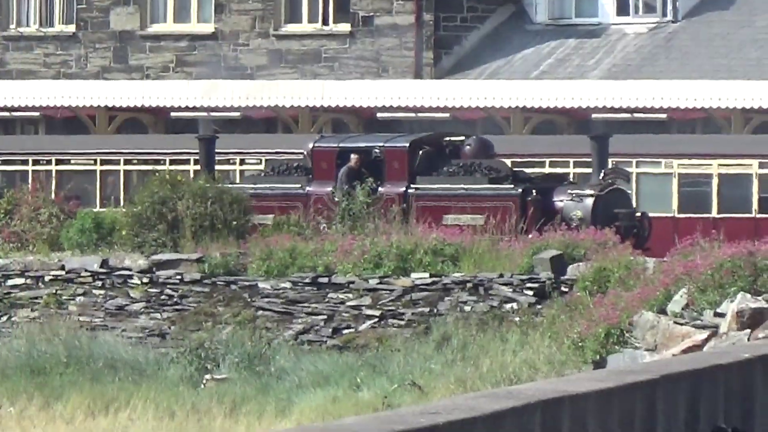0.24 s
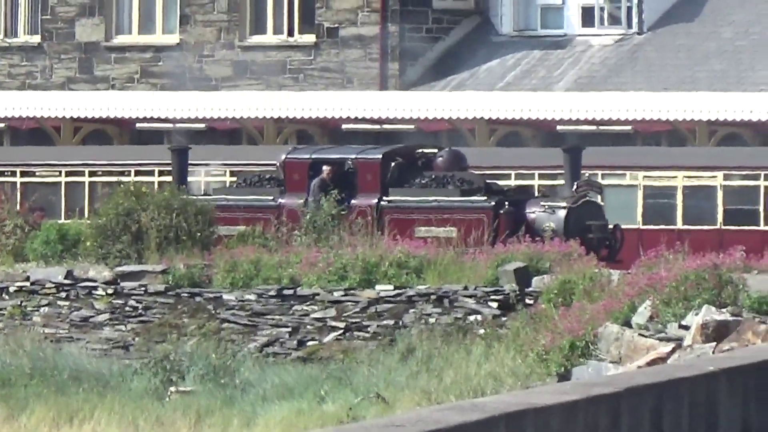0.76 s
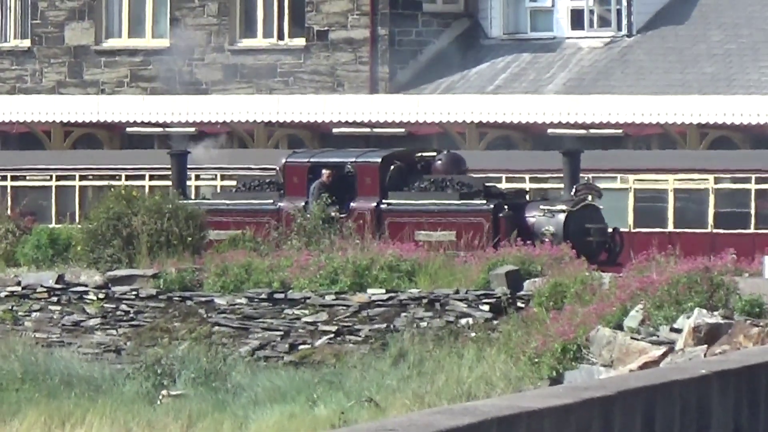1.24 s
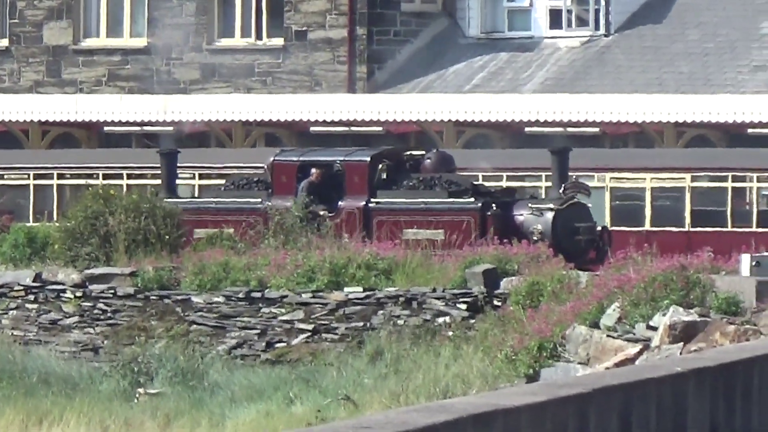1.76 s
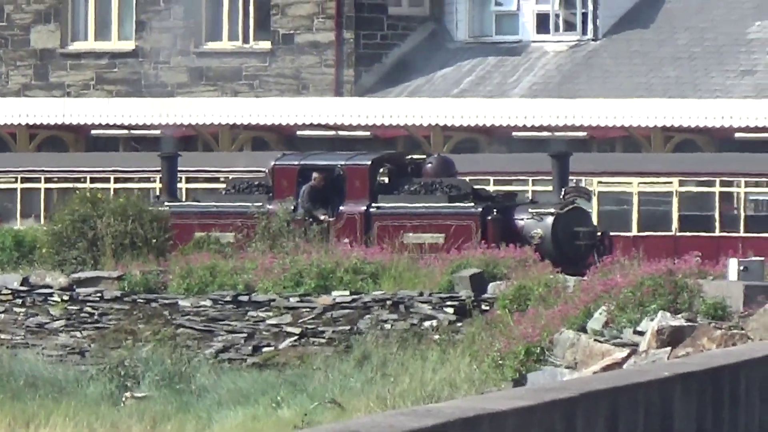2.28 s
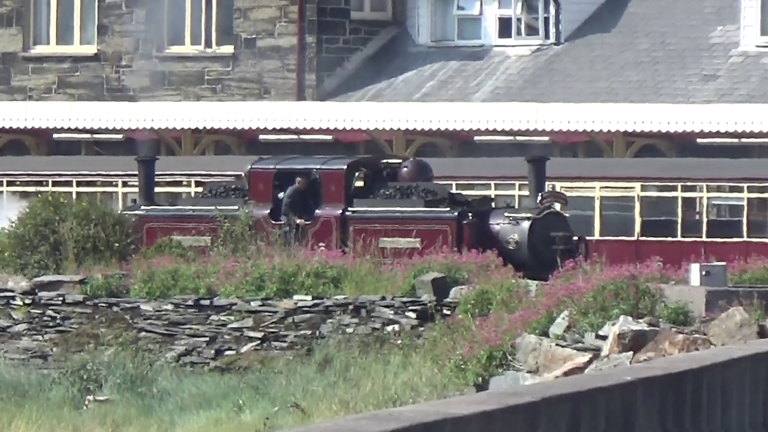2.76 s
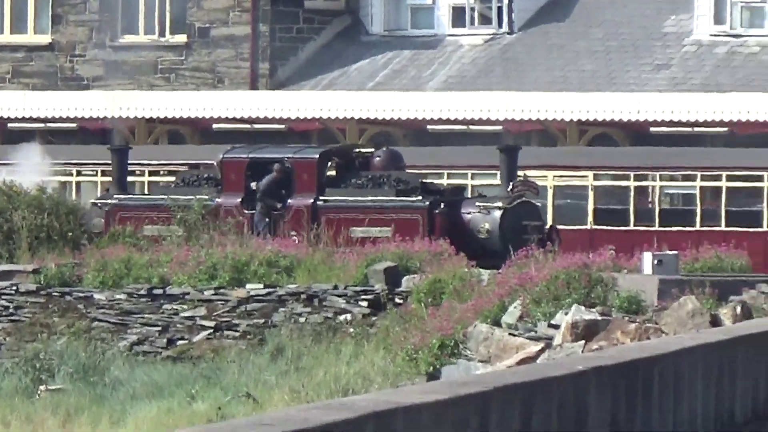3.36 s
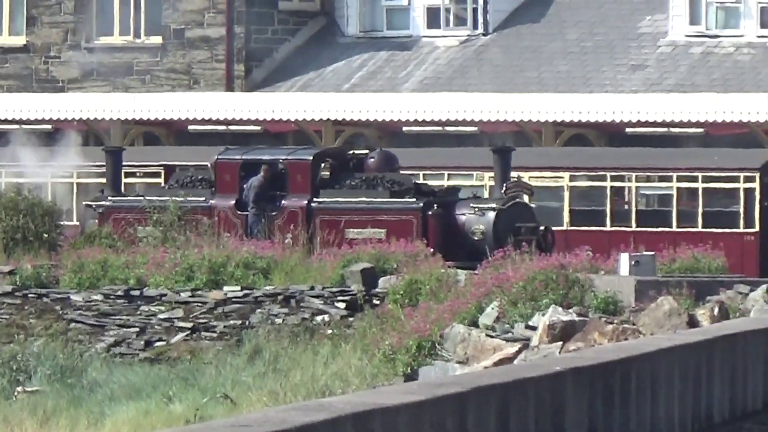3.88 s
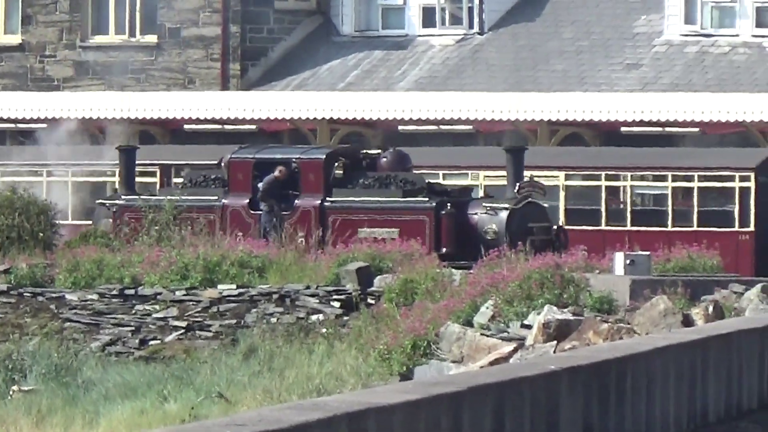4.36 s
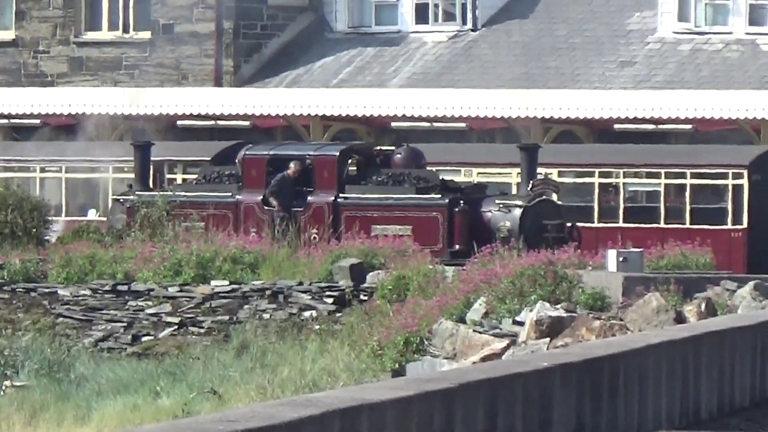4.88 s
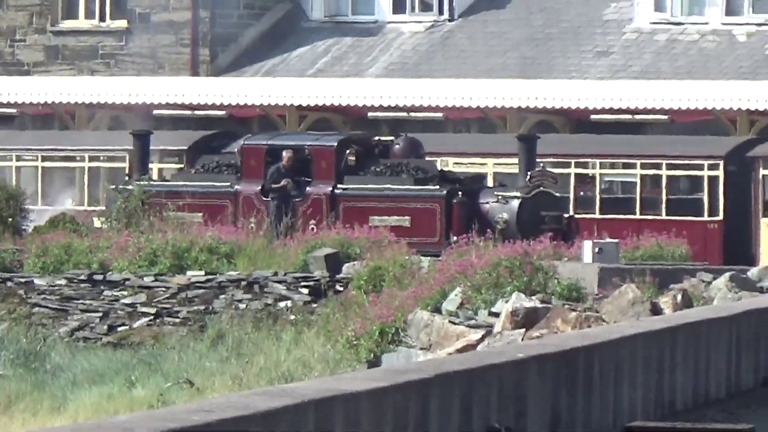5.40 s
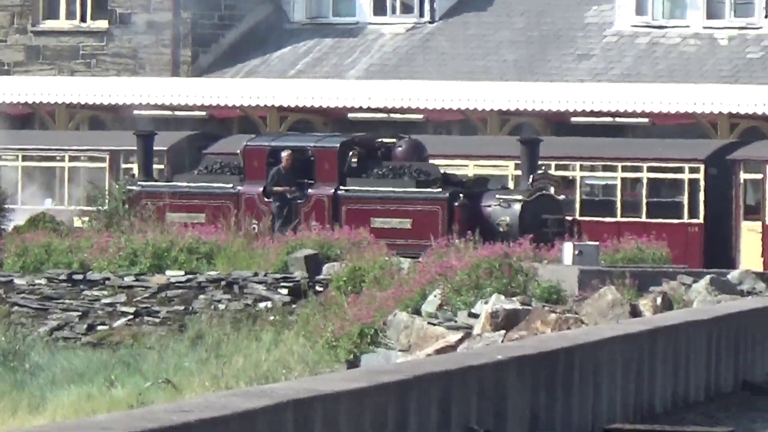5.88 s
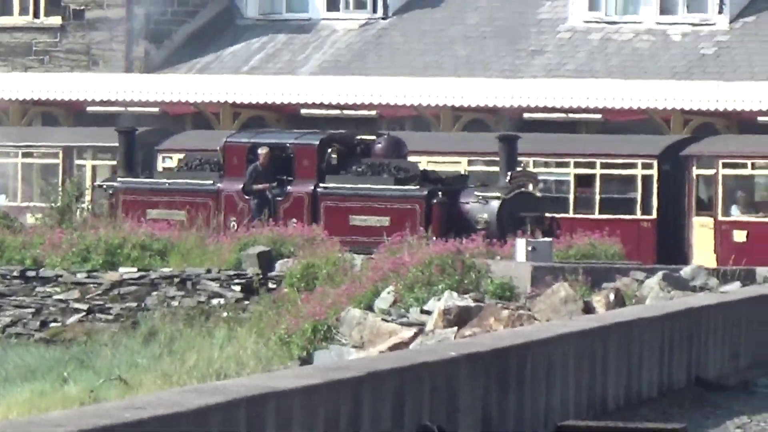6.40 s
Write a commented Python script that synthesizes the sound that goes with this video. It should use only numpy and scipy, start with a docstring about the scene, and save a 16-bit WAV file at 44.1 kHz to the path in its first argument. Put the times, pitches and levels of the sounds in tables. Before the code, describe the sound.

Steam rushes from a small engine across a bank, bright and fizzy, flickering with the breeze. Fluttering wind thumps crowd the microphones for the first second, breaking into short separate puffs. The hiss weakens and becomes almost quiet before five seconds, then recovers unevenly as wind gusts return. Small dull ticks occur now and then over low station rumble and very faint microphone hiss. No whistle or chuffing is heard.

```python
"""A small steam locomotive blows off steam as it creeps along a station across a bank: a bright jet that the
breeze makes swell and fade, over a duller roar thrown back by the buildings, all made of filtered noise.
Wind puffs buffet two microphone ports with low, lumpy noise; the strongest eddies flutter like short thumps.
Eddies pass the right port first. A few hollow ticks, damped notes near 700 Hz, are probably small sharp wind
puffs on the microphones. Yard rumble and microphone hiss lie beneath."""
import sys
import numpy as np
from scipy import signal
from scipy.fft import rfft, irfft, next_fast_len
from scipy.io import wavfile
from scipy.ndimage import uniform_filter1d, map_coordinates

SR = 44100
rng = np.random.default_rng(int(sys.argv[2]) if len(sys.argv) > 2 else 0)


def file_out(sig):
    """Save sig as 16-bit WAV at sys.argv[1]."""
    # one column per channel
    cols = np.atleast_2d(sig).T
    # limit, then scale
    lim = np.clip(cols, -1, 1)
    pcm = np.round(lim * 32767).astype(np.int16)
    wavfile.write(sys.argv[1], SR, pcm)


N = 292824
HZ = np.fft.rfftfreq(next_fast_len(N + 8192), 1 / SR)  # filter grid, padded so that tails do not wrap

# Stereo width of steam, yard and microphone hiss: f/Hz, left-right likeness (1 = mono)
STEADY_LIKENESS = [(60, 0.89), (95, 0.92), (150, 0.95), (240, 1), (380, 1), (600, 0.83), (950, 0.73),
                   (1500, 0.87), (2380, 0.92), (3770, 0.99), (5980, 0.86), (9470, 0.99), (15000, 1)]
# Stereo width of the wind before the ports are set apart in time: f/Hz, left-right likeness (1 = mono)
PORT_LIKENESS = [(60, 0.93), (200, 0.83), (400, 0.82), (800, 0.35)]


def amp(db):
    """dB to gain."""
    return 10 ** (np.asarray(db) / 20)


def unit(x):
    """x at rms 1."""
    return x / np.sqrt(np.mean(x ** 2) + 1e-20)


def along(points):
    """(f/Hz, value) points read on a log frequency axis."""
    f, v = np.transpose(points)
    return np.interp(np.log(HZ + 1), np.log(f + 1), v)


def curves(rows):
    """One value per sample for each column after the time."""
    s, *cols = np.transpose(rows)
    return [np.interp(np.arange(N) / SR, s, c) for c in cols]


def wobble(rate):
    """A smooth random curve through normal knots, rate knots a second."""
    knots = rng.standard_normal(int(N * rate / SR) + 4)
    return map_coordinates(knots, [np.arange(N) * rate / SR])


def filtered(x, response):
    """x times a complex response of frequency."""
    m = 2 * (len(HZ) - 1)
    return irfft(rfft(x, m) * response, m)[..., :N]


def blurred_grain(shape, bins, frames):
    """Random time-frequency gain field of rms 1, smoothed over bins and frames."""
    field = uniform_filter1d(rng.standard_normal(shape), bins, 0)
    return unit(uniform_filter1d(field, frames, 1))


def rush(spectrum, likeness, patchy_db, streaky_db):
    """Stereo noise of rms 1 with short broad patches and long narrow streaks of random gain."""
    z = signal.stft(rng.standard_normal((2, N)), nperseg=512)[2]
    patches = patchy_db * blurred_grain(z.shape[1:], bins=6, frames=16)
    streaks = streaky_db * blurred_grain(z.shape[1:], bins=2, frames=100)
    pair = signal.istft(z * amp(patches + streaks), nperseg=512)[1][:, :N]
    # mid and side shares that give the wanted left-right correlation
    turn = np.arccos(np.clip(along(likeness), -1, 1)) / 2
    mid, side = filtered(pair, amp(along(spectrum)) * [np.cos(turn), np.sin(turn)])
    return unit(np.array([mid + side, mid - side]))


def steam():
    """Air moving on the long path makes jet, fizz and leak flicker together; the reflected roar wavers slowly."""
    # Swell of the bright steam before flicker: t/s, jet level/dB, fizz level over jet/dB
    blow_off = [(0, -28.5, -5.5), (.11, -23.5, -4), (.35, -19, -4), (.46, -19.5, -7), (.52, -25, -7),
                (.59, -20.5, -6.5), (.79, -24, -3.5), (.9, -21.5, -5), (1.06, -19, -5), (1.22, -19.5, -7),
                (1.44, -21.5, -10), (1.51, -27, -6), (1.66, -21, -8), (1.77, -23, -7.5), (1.87, -20, -8),
                (2.29, -19, -7.5), (2.37, -20, -7.5), (2.43, -25, -6), (2.85, -26, -8),
                (3.28, -23.5, -10.5), (3.6, -26, -8), (3.87, -25, -3), (4.07, -26, -8.5), (4.27, -25, -8.5),
                (4.42, -31.5, -11.5), (4.64, -31, -7), (4.78, -34.5, -11.5), (4.92, -35.5, -9),
                (5.03, -27.5, -8), (5.22, -26, -7), (5.4, -29.5, -8.5), (5.75, -24.5, -9),
                (5.96, -25, -10.5), (6.1, -30.5, -9), (6.36, -22, -8), (6.64, -26, -8.5)]
    # Swell of the duller steam before flicker: t/s, wider leak level/dB, roar level/dB
    lower_steam = [(0.0, -30.5, -35), (0.11, -25.5, -34), (0.83, -28, -33), (0.98, -29, -36),
                   (1.83, -30, -35.5), (2.16, -24, -32.5), (2.61, -28, -36.5), (3.35, -25.5, -35.5),
                   (3.55, -29.5, -39.5), (4.08, -32.5, -41.5), (4.18, -31, -39), (4.88, -32.5, -43),
                   (5.23, -29.5, -39), (5.42, -34.5, -35), (5.99, -26.5, -38.5), (6.07, -29.5, -41.5),
                   (6.31, -27, -34.5), (6.64, -28.5, -37.5)]
    # Noise colours: f/Hz, density/dB per Hz
    jet_colour = [(1940, -35), (3300, -4.5), (3800, 0), (4520, 0), (4920, -2.5), (5370, -1.5),
                  (7400, -13.5), (9620, -25), (16300, -120)]
    fizz_colour = [(3880, -26), (6600, -5.5), (7350, -5), (9230, -1), (10500, -6), (13400, -26),
                   (14700, -69), (15000, -54), (15200, -88), (15500, -87)]
    leak_colour = [(1240, -35), (2100, -6.5), (2420, -5), (2620, -2.5), (3120, -3.5), (3800, -10.5),
                   (4940, -31), (8360, -120)]
    roar_colour = [(350, -32), (600, -16), (870, -9), (1260, -3.5), (1480, -4.5), (1830, -1), (2010, -6.5),
                   (2400, -8.5), (3120, -19.5), (5280, -120)]
    # Stereo balance: f/Hz, left over right/dB
    left_lean = [(60, 0.0), (150, 6), (380, -13), (950, -1), (2380, 0), (5980, 2.5), (15000, -1.5)]

    jet_db, fizz_over_jet_db = curves(blow_off)
    leak_db, roar_db = curves(lower_steam)
    flicker = wobble(30) + 0.5 * wobble(12)
    jet = rush(jet_colour, STEADY_LIKENESS, patchy_db=0.83, streaky_db=0.25)
    jet = jet * amp(jet_db + 0.49 * flicker)
    fizz = rush(fizz_colour, STEADY_LIKENESS, patchy_db=1.56, streaky_db=1.3)
    fizz = fizz * amp(jet_db + fizz_over_jet_db + 0.84 * flicker)
    leak = rush(leak_colour, STEADY_LIKENESS, patchy_db=1.0, streaky_db=0.0)
    leak = leak * amp(leak_db + 0.28 * flicker)
    roar = rush(roar_colour, STEADY_LIKENESS, patchy_db=0.06, streaky_db=2.05)
    roar = roar * amp(roar_db + 0.53 * wobble(7))
    half_lean = along(left_lean) / 2
    return filtered(echo_bands(jet + fizz + leak + roar), amp([half_lean, -half_lean]))


def wind():
    """Lumpy turbulence on the ports; it drifts from right to left, so the left port hears it late."""
    # Eddy colours: f/Hz, density/dB per Hz
    big_colour = [(15, -56), (25, -39), (70, -9), (92, -4), (156, 0.5), (232, -3), (270, -4.5), (400, -14),
                  (520, -35), (880, -120)]
    small_colour = [(140, -35), (230, -0.5), (350, -3.5), (426, -6), (587, -8), (635, -10), (1100, -22.5),
                    (1430, -66), (2420, -120)]

    big_gain, small_gain = puffs()
    lumps_db = 2.6 * wobble(100) + 0.67 * wobble(25)
    big = amp(lumps_db) * rush(big_colour, PORT_LIKENESS, patchy_db=0.0, streaky_db=0.5)
    small = amp(1.5 * lumps_db) * rush(small_colour, PORT_LIKENESS, patchy_db=2.0, streaky_db=0.5)
    eddies = big_gain * unit(big) + small_gain * unit(small) + thumps()
    lag_ms = 0.55
    half_lag = np.exp(-1j * np.pi * HZ * lag_ms / 1000)  # delays left, its conjugate advances right
    return filtered(eddies, np.array([half_lag, half_lag.conj()]))


def puffs():
    """Gains of big and small eddies: each puff rises fast, holds and falls away into near calm."""
    # Puffs of wind on the ports: start t/s, length/s, buffet level/dB, small eddies over buffet/dB
    gusts = [(0, 0.29, -21.5, 1.5), (0.294, 0.28, -22.5, -0.5), (0.528, 0.23, -24.5, -0.5),
             (0.775, 0.21, -24.5, 0), (1.013, 0.15, -22, 0.5), (1.2, .04, -29, -3),
             (1.323, 0.054, -26, -7.5), (1.401, .05, -18, -5.5), (1.465, 0.045, -23.5, -9),
             (1.57, 0.068, -32, -15.5), (1.676, 0.083, -25.5, -12), (1.781, 0.057, -18, -6.5),
             (1.89, .05, -22.5, -3.5), (1.97, .05, -23, -4.5), (2.057, 0.11, -30, -5),
             (2.204, 0.11, -24, -5), (2.278, .13, -23.5, -2), (2.43, 0.081, -26, -12),
             (2.567, 0.056, -29, -8), (2.674, 0.092, -34.5, -14), (2.834, 0.081, -24, -3.5),
             (3.041, 0.027, -22, -17), (3.133, .08, -25.5, -13.5), (3.207, 0.18, -33.5, -12),
             (3.493, 0.048, -41, -23), (3.723, 0.055, -44, -9), (3.907, .05, -38, -12),
             (3.953, .04, -28.5, -6), (4.062, 0.037, -30, -7), (4.13, 0.064, -47, -16),
             (4.343, 0.043, -33, -2), (4.42, 0.052, -42.5, 0), (4.645, 0.052, -33, -22),
             (4.807, 0.27, -40.5, -8), (5.17, 0.14, -27.5, -8.5), (5.283, 0.038, -23.5, 2.5),
             (5.366, 0.1, -19.5, -1.5), (5.506, .13, -24, -5), (5.663, 0.042, -35, -8),
             (5.787, .08, -35, -12), (5.944, 0.05, -36.5, -2), (6.204, .1, -23.5, -13),
             (6.305, 0.075, -26.5, -2), (6.395, 0.11, -20.5, -2), (6.542, 0.069, -24, -9)]
    rise_s, fall_s, calm_db = 0.0079, 0.011, -57

    def edge(u):
        return 0.5 + 0.5 * np.tanh(u / 2)

    t = np.arange(N) / SR
    gains = amp(calm_db)
    for start, length, big_db, small_over_db in gusts:
        envelope = edge((t - start) / rise_s) * edge((start + length - t) / fall_s)
        gains = gains + amp([[big_db], [big_db + small_over_db]]) * envelope
    return gains


def yard_rumble():
    """Steady low noise of the station yard, grainy and streaked in tone."""
    # Rumble colour: f/Hz, density/dB per Hz
    rumble_colour = [(18, -42), (30, -6), (119, 5), (278, -6.5), (405, -7), (630, -2), (792, -10.5),
                     (1230, 1), (1500, -6.5), (1950, -30), (3300, -120)]
    level_db = -39.5
    return amp(level_db) * rush(rumble_colour, STEADY_LIKENESS, patchy_db=2.5, streaky_db=2.5)


def mic_hiss():
    """Steady, faint high self-noise of the microphones."""
    # Self-noise colour: f/Hz, density/dB per Hz
    hiss_colour = [(3530, -32), (6000, -8), (9100, 1), (11700, -10), (12000, 0), (15500, -19)]
    level_db = -52
    return amp(level_db) * rush(hiss_colour, STEADY_LIKENESS, patchy_db=2.0, streaky_db=2.0)


def thumps():
    """Each strong eddy is a soft-edged burst: a few peaked, unsteady cycles inside ragged turbulence."""
    # Strong eddies: t/s, strength/dB, flutter f/Hz before its random glide
    strong_eddies = [(0.017, -2, 280), (0.061, -7, 200), (0.173, -9.5, 218), (0.271, -11, 249),
                     (0.355, -8.5, 245), (0.417, -12, 265), (0.478, -17, 310), (0.553, 1.5, 271.5),
                     (0.779, -0.5, 384), (0.911, -13, 191), (1.031, -10, 257), (1.315, -14, 203),
                     (1.408, -7, 242), (1.608, -16.5, 187), (1.808, -9.5, 195.5), (1.979, -11, 267),
                     (2.229, -16, 197), (2.265, -17, 320), (2.406, -14, 212), (2.459, -13.5, 210),
                     (2.834, -15.5, 284), (2.903, -12.5, 246), (3.16, -18, 194.5), (5.171, -16.5, 250),
                     (5.291, -8, 222), (5.369, -13, 189), (5.406, -6, 252), (5.549, -13, 246),
                     (6.196, -20, 198), (6.238, -10.5, 251), (6.313, -13, 254), (6.407, -9, 270)]
    # Colour of the ragged part: f/Hz, density/dB per Hz
    ragged_colour = [(35, -45), (60, -13), (146, 0), (254, -1.5), (383, 3.5), (641, -22), (1300, -15),
                     (1690, -51), (2860, -120)]
    swell_s = 0.0095  # time scale of the burst, which peaks at 1.1 times this

    out = np.zeros((2, N + SR))
    ragged = rush(ragged_colour, PORT_LIKENESS, patchy_db=0.5, streaky_db=1.0)
    ragged = np.pad(ragged, ((0, 0), (0, SR)))
    chance = rng.standard_normal((len(strong_eddies), 4))
    ports = np.array([[1], [-1]])  # left, right
    t = np.arange(int(3 * swell_s * SR)) / SR
    swell = np.exp(-2 * (t / swell_s - 1.1) ** 2)
    for (s, db, hz), (phase, glide, skew, tilt) in zip(strong_eddies, chance):
        span = slice(round(s * SR), round(s * SR) + len(t))
        turn = 2 * np.pi * hz * t * (1 + 0.025 * glide * t / swell_s)
        turn = turn + np.pi * phase + 0.27 * skew * ports
        cycles = np.sin(turn) + 0.35 * np.cos(2 * turn)  # the octave makes one side peaked
        burst = 0.75 * cycles + 0.4 * ragged[:, span]
        out[:, span] += amp(db - 3.0 + 0.89 * tilt * ports) * swell * burst
    return out[:, :N]


def echo_bands(x):
    """Echoes reinforce narrow bands of the steam, which glide as the engine creeps; each swells in, and all but
    the last fade out again, while the last is still strong at the end."""
    # Bands: start t/s, end t/s, start f/Hz, end f/Hz, width/Hz, lift/dB
    bands = [(.15, 0.48, 5950, 5800, 190, 7), (3.5, 3.6, 8900, 9100, 290, 8.5),
             (0.95, 2.3, 2570, 2560, 22, 9.5), (0.98, 1.26, 5600, 5550, 290, 6.5),
             (0.9, 3, 1480, 2300, 170, 3), (2, 2.47, 5260, 5100, 140, 6.5),
             (3.25, 4.4, 5240, 5700, 77, 6.5), (3.35, 3.56, 8000, 8800, 250, 1),
             (3.46, 4.33, 3650, 3950, 96, 4.5), (3.8, 4.4, 6500, 6400, 120, 2),
             (4.95, 5.4, 3150, 3200, 160, 4.5), (4.42, 4.74, 2630, 2740, 100, 2.5),
             (1.4, 8.5, 8300, 8200, 150, 4.5)]
    hz, t, z = signal.stft(x, SR, nperseg=1024)
    lift_db = np.zeros(z.shape[1:])
    for start, end, from_hz, to_hz, width_hz, db in bands:
        u = np.clip((t - start) / (end - start), 0, 1)
        centre = from_hz + (to_hz - from_hz) * u
        fade = np.sqrt(np.abs(np.sin(np.pi * u)))
        lift_db += db * fade * np.exp(-0.5 * ((hz[:, None] - centre) / width_hz) ** 2)
    return signal.istft(z * amp(lift_db), SR, nperseg=1024)[1][:, :N]


def ticks():
    """Short hollow ticks near 700 Hz, probably small sharp wind puffs on the microphones: two damped notes each."""
    # Ticks: t/s, strength/dB, upper note f/Hz
    hits = [(1.774, -12, 740), (2.527, -18.5, 835), (2.843, -22, 750), (3.295, -23.5, 794),
            (4.083, -18.5, 640), (4.47, -21.5, 724)]
    t60_s, rise_s = 0.025, 0.0012
    low_pitch, low_share = 0.58, 0.36  # relative to the upper note

    out = np.zeros(N)
    t = np.arange(SR // 10) / SR
    for s, db, hz in hits:
        upper = np.sin(2 * np.pi * hz * t)
        lower = low_share * np.sin(2 * np.pi * low_pitch * hz * t)
        envelope = amp(db - 60 * t / t60_s) * (1 - np.exp(-t / rise_s))
        out[round(s * SR):][:len(t)] += envelope * (upper + lower)
    return out


def scene():
    """Steam, wind on the ports, the steady rumble of the station yard, microphone hiss and ticks."""
    return steam() + wind() + yard_rumble() + mic_hiss() + ticks()


def record(dry):
    """The input rounds off the highest peaks and keeps nothing above its band limit."""
    top_hz = 15638
    soft = dry / (1 + np.abs(dry / 0.99) ** 8) ** (1 / 8)
    return filtered(soft, HZ < top_hz)


dry = scene()
out = record(dry)
file_out(out)
```